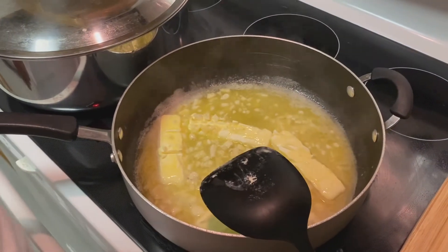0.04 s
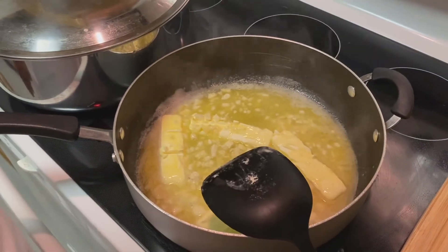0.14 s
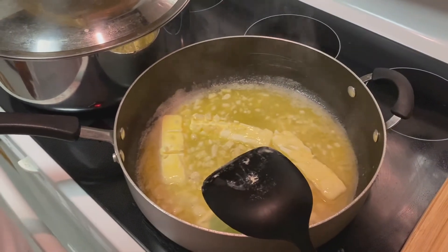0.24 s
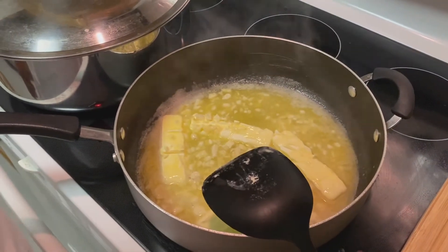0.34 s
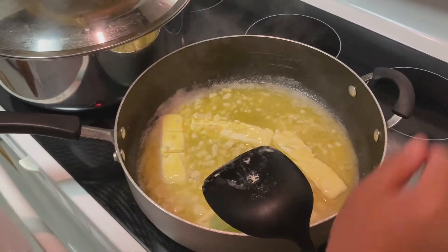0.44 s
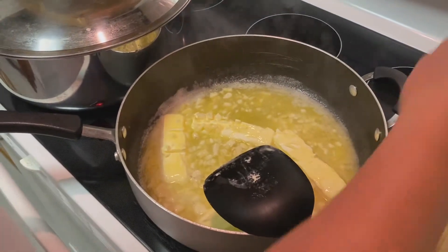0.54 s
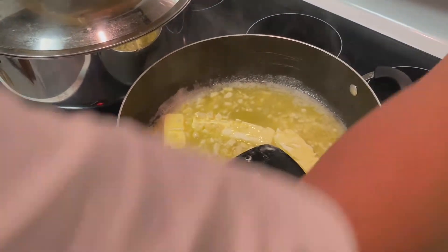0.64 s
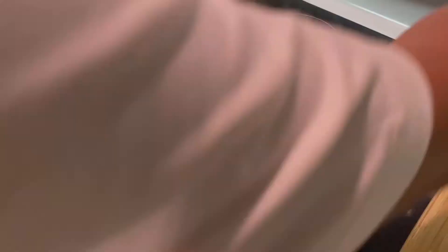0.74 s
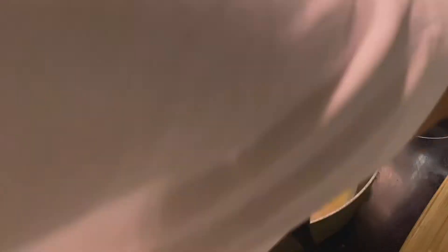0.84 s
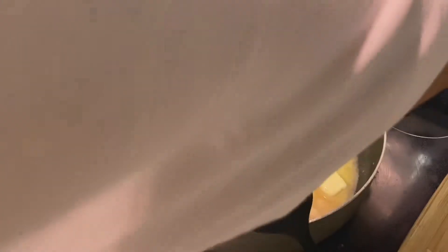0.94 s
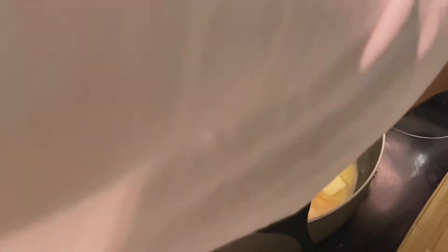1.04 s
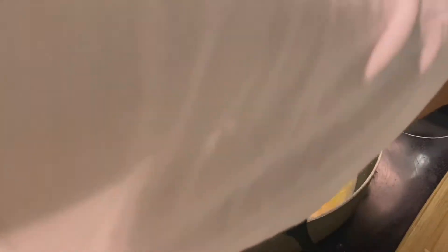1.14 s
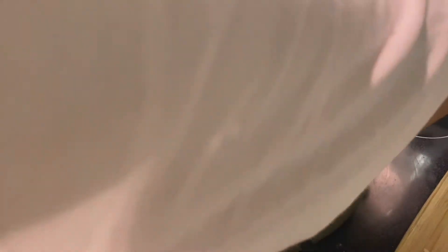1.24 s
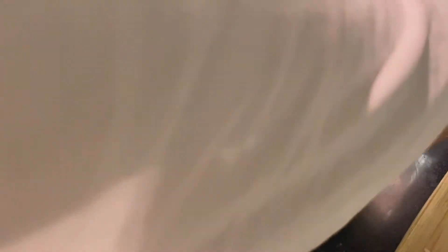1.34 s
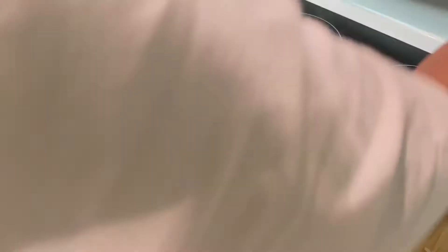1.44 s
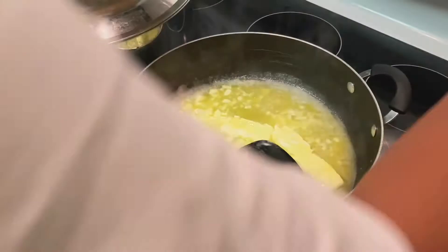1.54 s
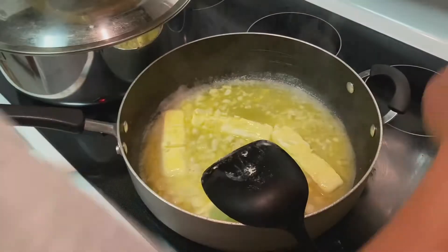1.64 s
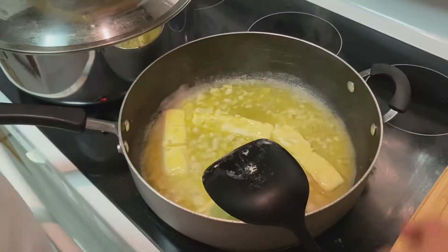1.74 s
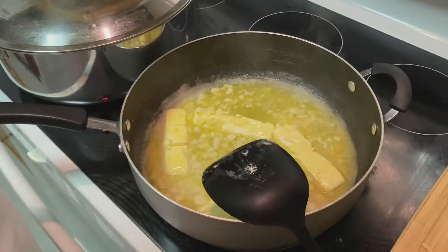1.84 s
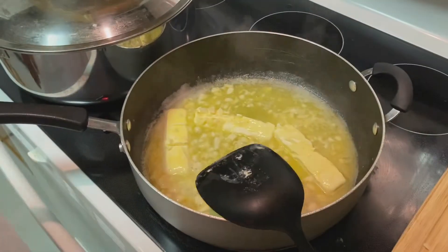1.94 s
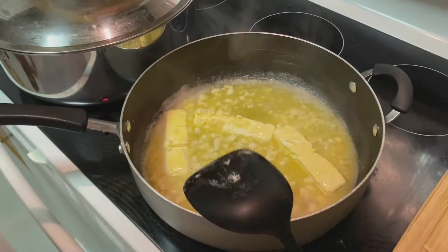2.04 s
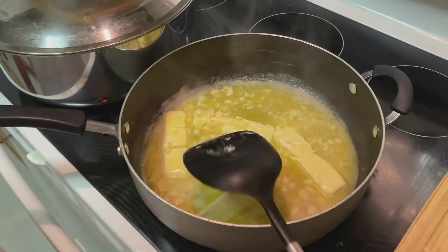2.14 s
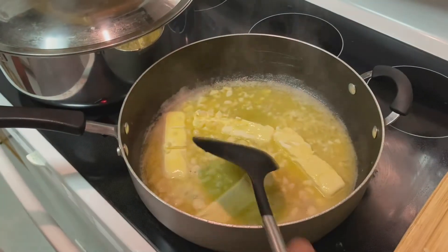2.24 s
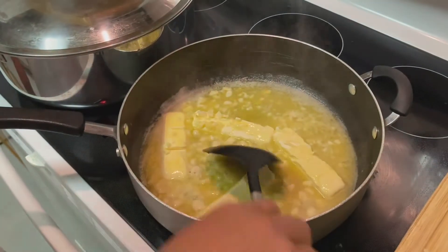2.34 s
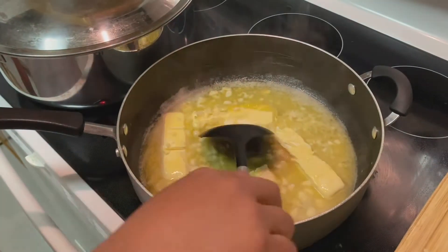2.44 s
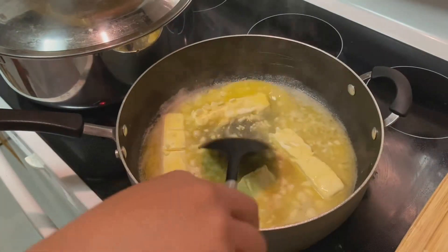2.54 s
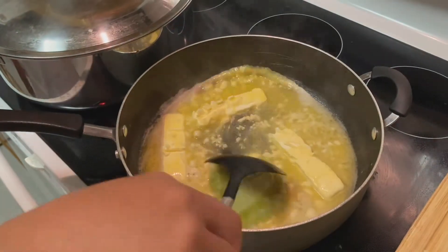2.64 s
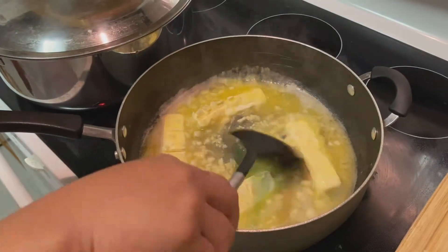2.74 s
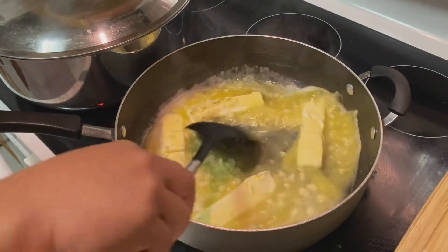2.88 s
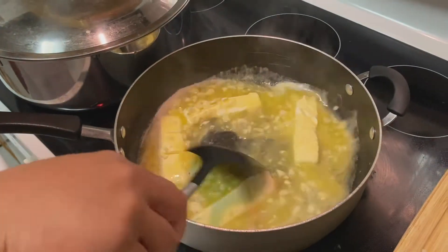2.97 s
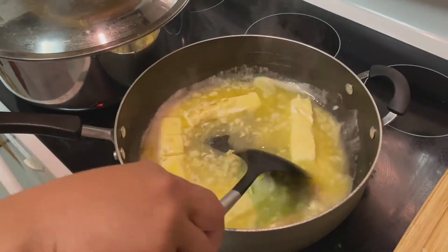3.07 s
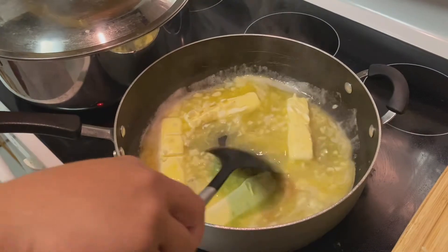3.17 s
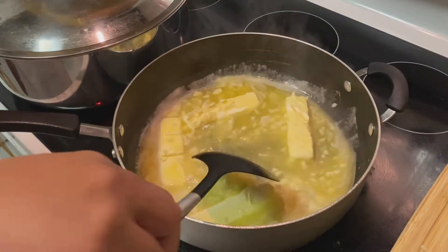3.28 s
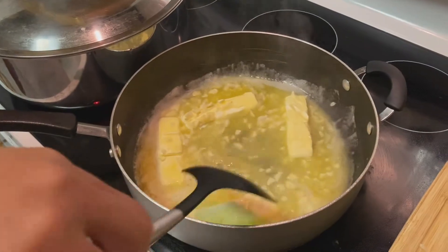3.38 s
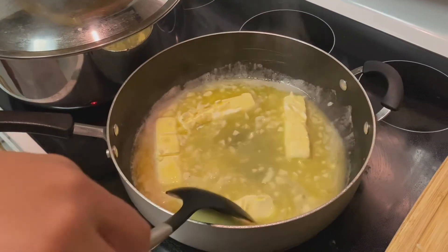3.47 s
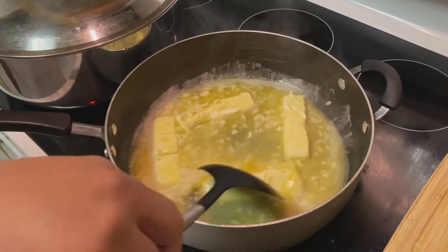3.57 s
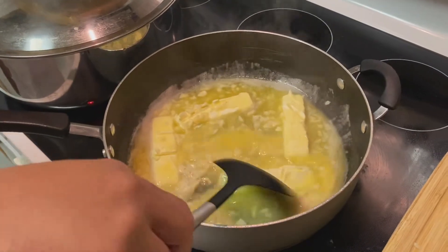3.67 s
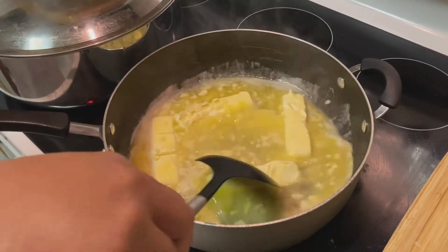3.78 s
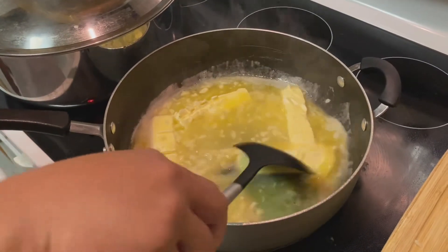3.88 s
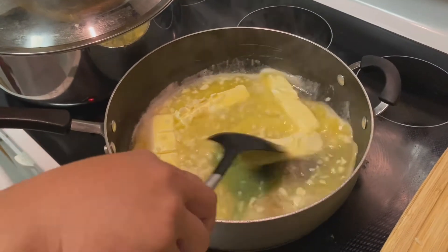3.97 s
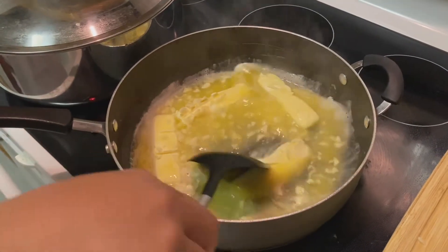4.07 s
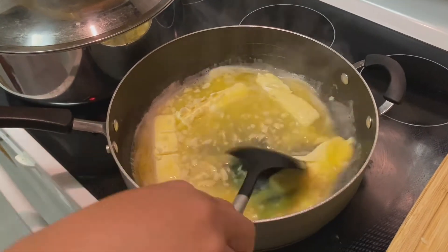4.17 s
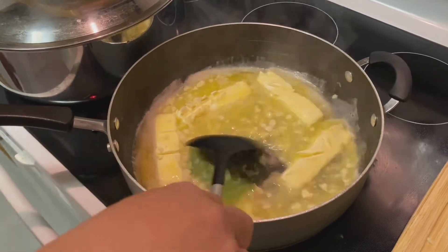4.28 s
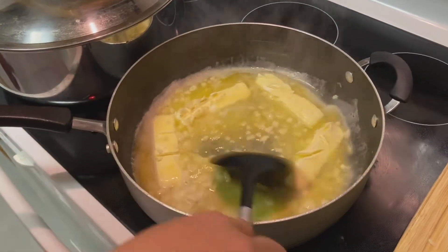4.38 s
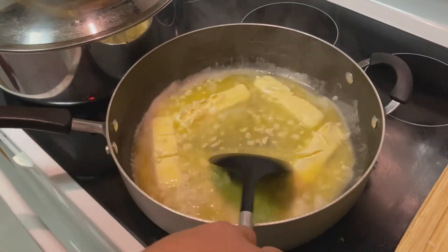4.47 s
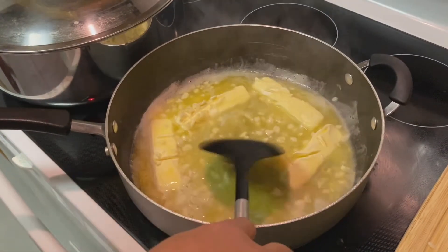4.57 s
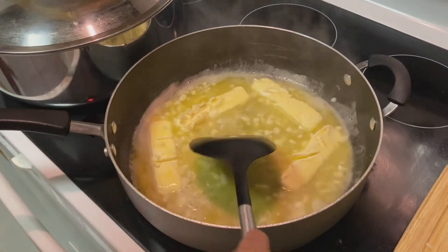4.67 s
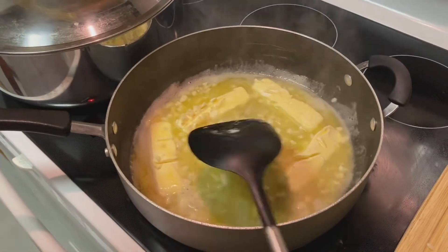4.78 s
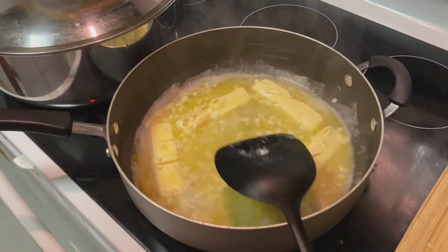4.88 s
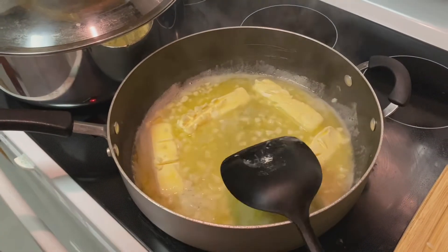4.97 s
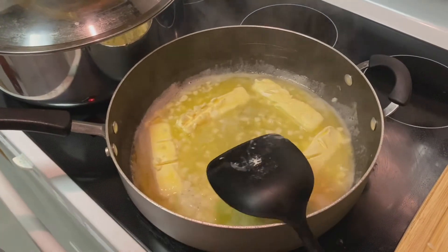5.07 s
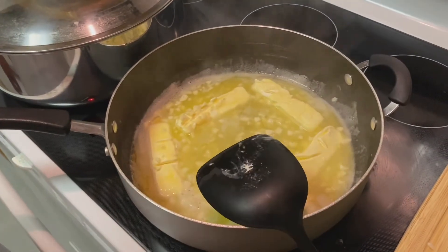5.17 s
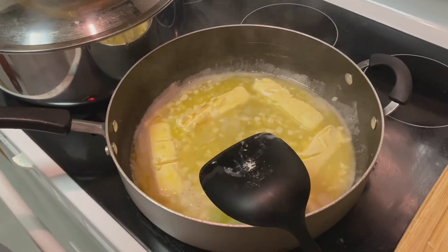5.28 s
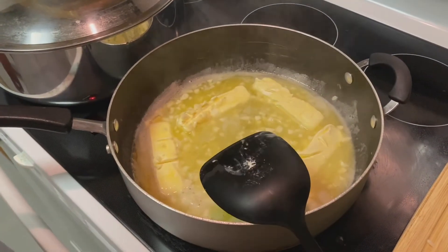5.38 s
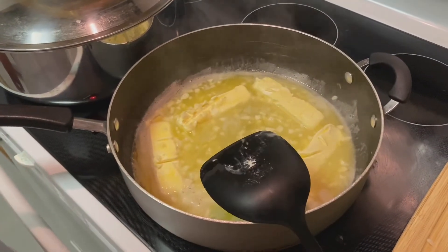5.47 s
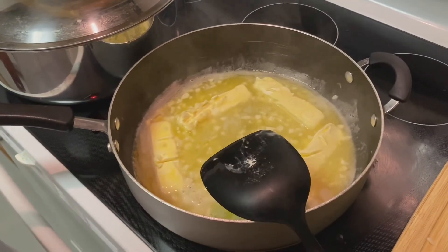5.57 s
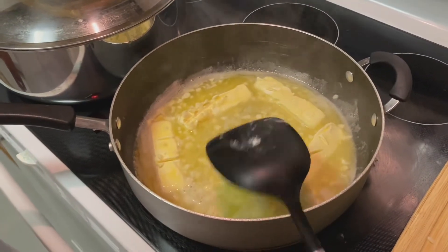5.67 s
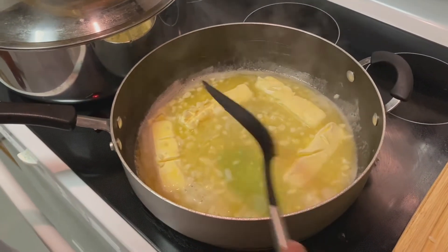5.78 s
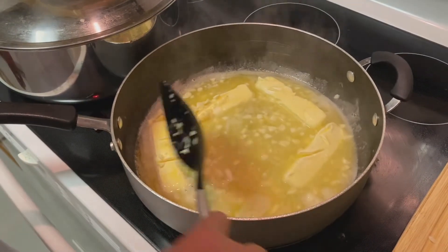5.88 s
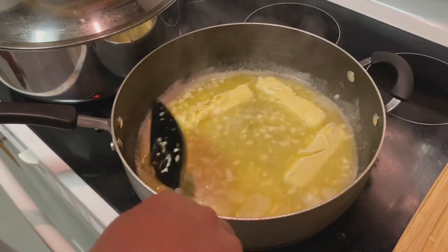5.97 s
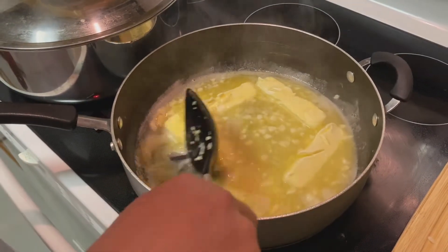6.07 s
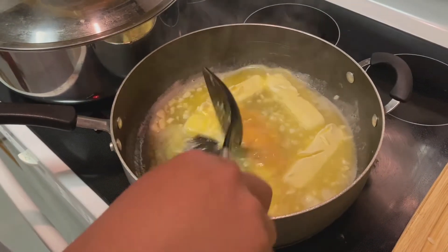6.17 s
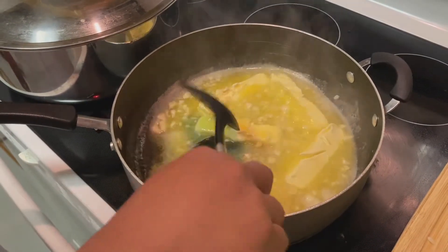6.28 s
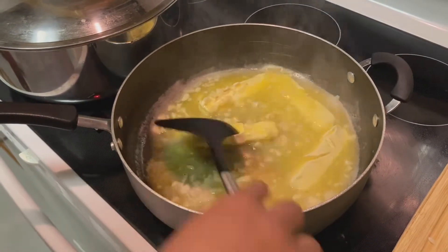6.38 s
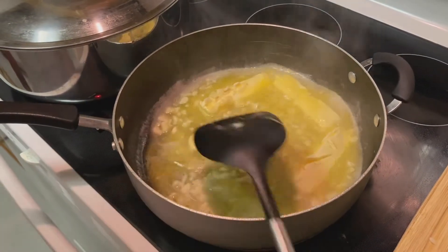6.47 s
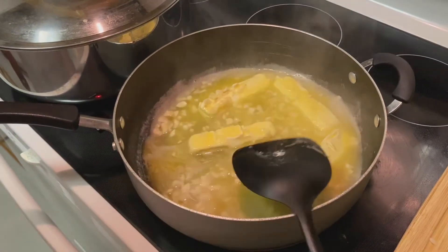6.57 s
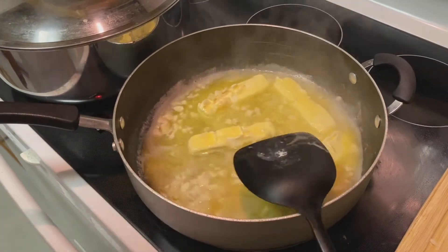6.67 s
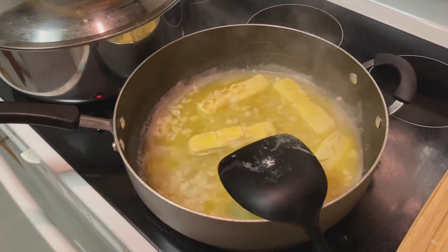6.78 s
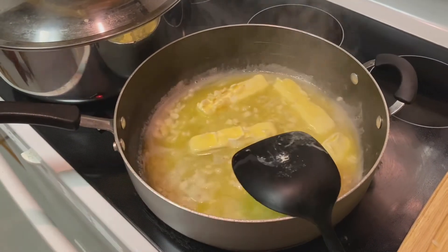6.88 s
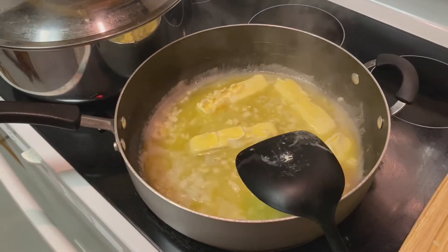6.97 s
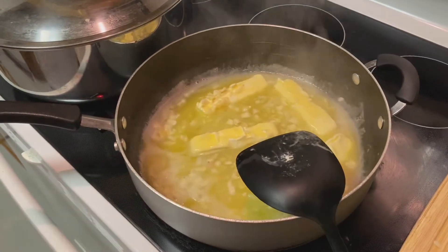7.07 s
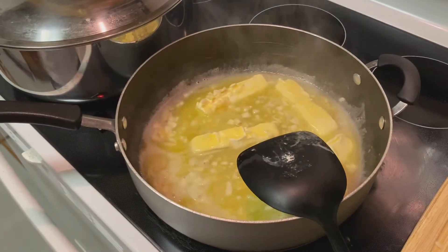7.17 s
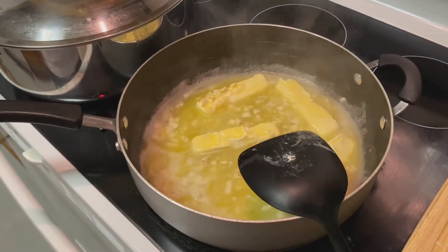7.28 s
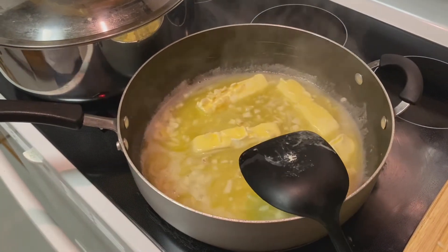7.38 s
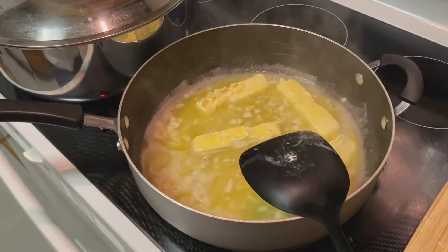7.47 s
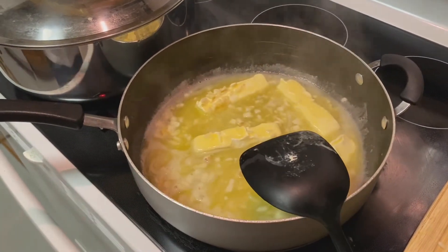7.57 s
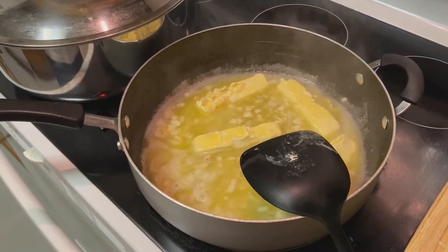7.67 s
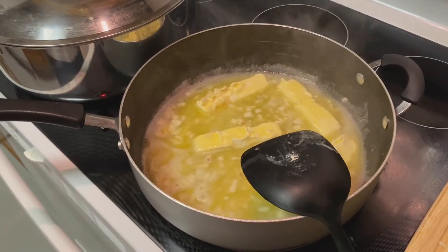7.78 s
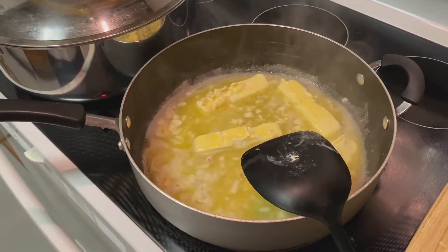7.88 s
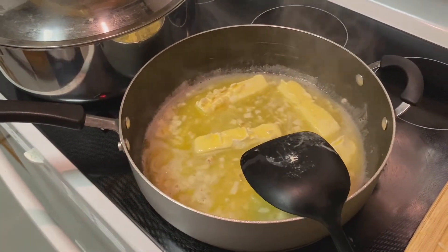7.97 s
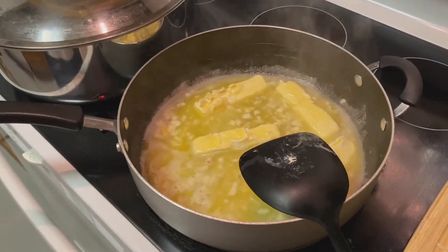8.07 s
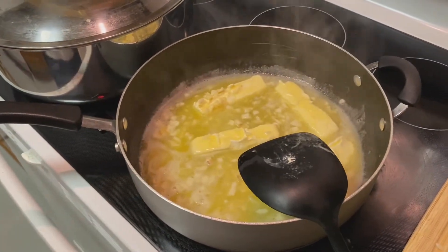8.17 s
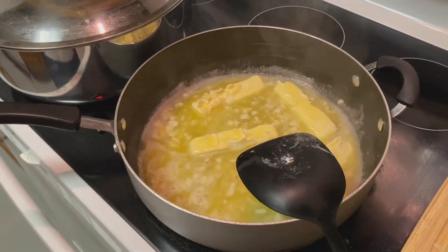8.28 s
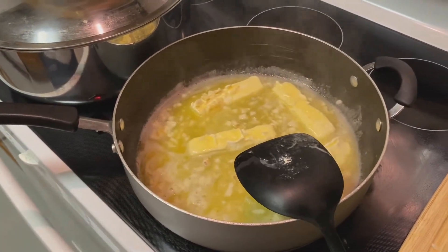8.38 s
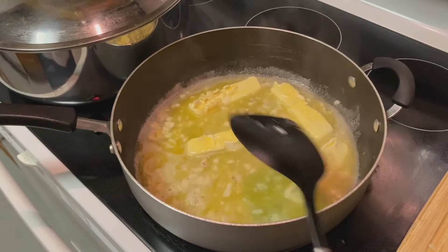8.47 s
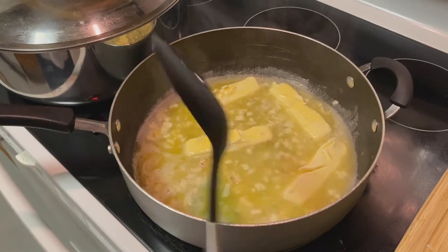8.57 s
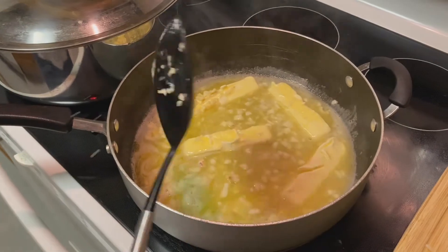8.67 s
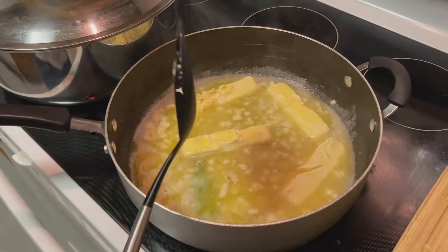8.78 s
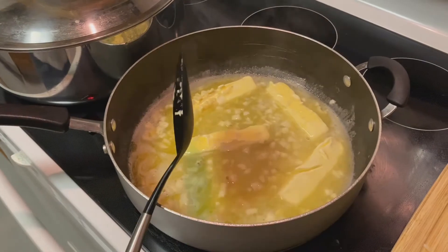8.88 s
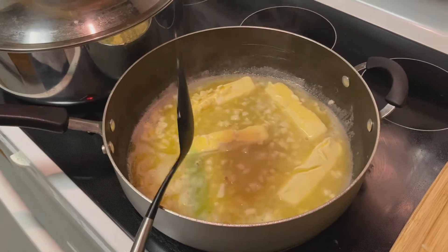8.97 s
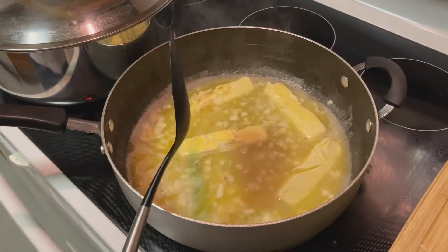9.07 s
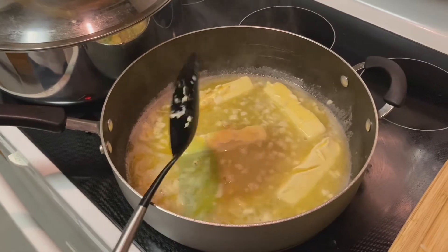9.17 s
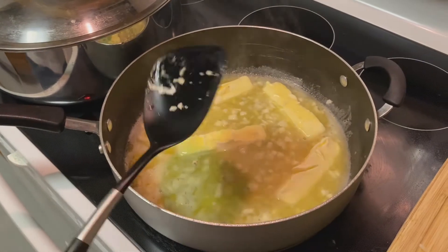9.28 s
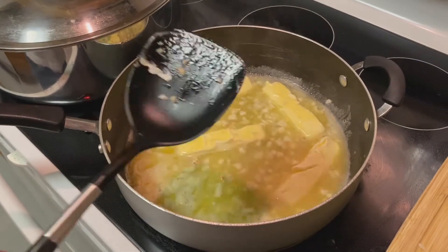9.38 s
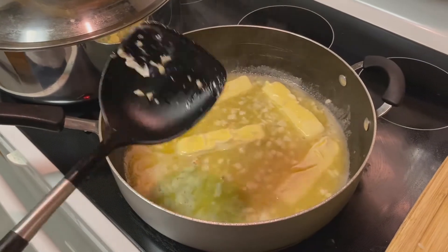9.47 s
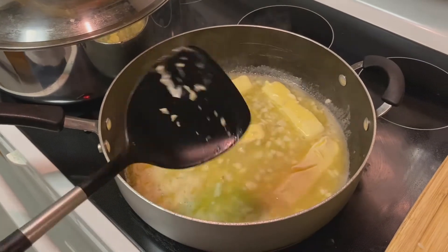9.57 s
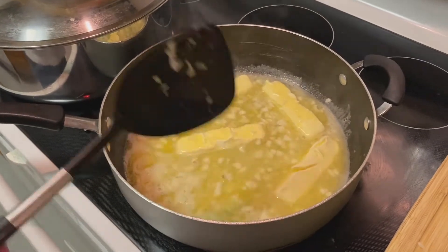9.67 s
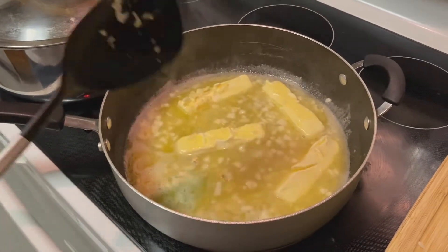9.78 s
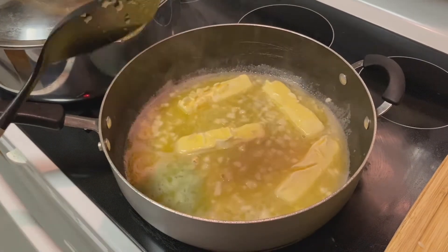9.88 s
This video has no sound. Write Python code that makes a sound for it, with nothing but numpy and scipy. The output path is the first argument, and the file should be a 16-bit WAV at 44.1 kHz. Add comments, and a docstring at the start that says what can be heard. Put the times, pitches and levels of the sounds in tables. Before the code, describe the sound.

A small home kitchen, heard close in stereo, with low rumble and faint mains hum. Butter and garlic fizz softly throughout, with tiny pops and occasional bubbling. Around 0.8-1.1 s clothes rustle faintly; light bumps follow at 1.3 and 1.8 s, with short scrapes near 2 s. From 2.7 to 3.2 s a plastic spatula knocks and scrapes the nonstick pan as the sizzle flares. Softer scrapes come at 3.8 and 4.2 s with another flare. At 4.9-5.2 s the spatula clacks down on the rim. A sharp knock at 5.9 s leads to brief scraping, a swelling fizz, and a second clattery laying-down at 6.5-6.9 s. Cloth rustles at 7.1-7.6 s and slightly at 8.1 s. A quick fizz burst and light scrape come near 8.4 s, then two hard, ringing raps at 9.0 and 9.1 s, leaving quiet sizzling until about 9.9 s.

```python
"""In a small kitchen with a low hum, butter and garlic sizzle throughout in a nonstick pan on a glass hob.
The cook's clothes rustle; then a plastic spatula, ringing the modes of pan and hob, knocks and scrapes by
stick and slip. Near 4.9 s and 6.6 s it is laid down with its neck on the rim and adds its own modes.
Clothes rustle again as friction noise, and near 9 s two raps on the rim shake the spatula clean.
The fizz is filtered noise that flares four times; a small stereo recorder is held close by."""
import sys
import numpy as np
from scipy import signal
from scipy.fft import rfft, irfft, next_fast_len
from scipy.io import wavfile

SR = 44100
rng = np.random.default_rng(int(sys.argv[2]) if len(sys.argv) > 2 else 0)


def store_wav(level_fs):
    """Save 16-bit WAV to argv[1]."""
    pcm = np.round(np.clip(np.atleast_2d(level_fs), -1, 1) * 32767)
    wavfile.write(sys.argv[1], SR, pcm.T.astype(np.int16))


N = 437913
RING = int(.7 * SR)  # longest ring, in samples
AGE = np.arange(RING) / SR  # time since the contact, s


def from_db(db):
    """Logarithmic level: decibels become an amplitude gain."""
    return 10 ** (np.asarray(db) / 20)


def rms(x):
    """Effective value: root of the mean square."""
    return np.sqrt(np.mean(x ** 2) + 1e-24)


def at_hz(points, hz):
    """Interpolation of a curve along a logarithmic frequency axis."""
    f, value = np.transpose(points)
    return np.interp(np.log(np.maximum(hz, 1)), np.log(f), value)


def butter(x, hz, kind):
    """Maximally flat recursive filtering, designed at order two."""
    return signal.sosfilt(signal.butter(2, hz, kind, fs=SR, output="sos"), x)


def below(x, hz):
    """Low half of a fourth-order crossover."""
    return butter(butter(x, hz, "low"), hz, "low")


def above(x, hz):
    """High half of a fourth-order crossover."""
    return butter(butter(x, hz, "high"), hz, "high")


def add(out, s, sound):
    """Superposition of a sound from time s on."""
    i = max(round(s * SR), 0)
    out[:, i:i + sound.shape[1]] += sound[:, :out.shape[1] - i]


def panned(sound, db):
    """Level difference between the channels: leans a sound to the left by db."""
    return sound * from_db([[db / 2], [-db / 2]])


def dying(t60):
    """Exponential decay by 60 dB in t60 seconds."""
    return from_db(-60 * AGE / t60)


def resonate(x, hz, q, boost_db):
    """Resonance: adds a peak-filtered copy to a sound."""
    return x + from_db(boost_db) * signal.lfilter(*signal.iirpeak(hz, q, fs=SR), x)


def gliding(x, hz, q, boost_db, size=128):
    """Moving resonance: its centre (Hz, per sample) is renewed block by block."""
    lifted, state = np.zeros_like(x), np.zeros((2, 2))
    for i in range(0, x.shape[1], size):
        peak = signal.iirpeak(hz[i], q, fs=SR)
        lifted[:, i:i + size], state = signal.lfilter(*peak, x[:, i:i + size], zi=state)
    return x + from_db(boost_db) * lifted


def grains(per_s, spread_db, size):
    """Random impulse process: clicks of uneven size and either sign."""
    sizes = from_db(spread_db * np.minimum(rng.exponential(1, size), 4))
    sizes = sizes * rng.choice([-1, 1], size)
    return sizes * (rng.random(size) < per_s / SR)


def tone(rule, weight_db, hardness_db):
    """Contact mechanics: weight drives thud and body, hardness drives clack and crisp (all dB)."""
    thud_db, body_db, body_share, clack_db, clack_share, crisp_db = rule
    thud = thud_db + weight_db
    body = body_db + body_share * weight_db
    clack = clack_db + clack_share * hardness_db
    return thud, body, clack, crisp_db + hardness_db


# borders between thud, body, middle, clack and crisp: (border_hz)
BORDERS = [200, 600, 1800, 4000]


def voiced(sound, level_db, colour, start, end):
    """Band energy: sets the level of each of five bands by its rms between start and end (s)."""
    thud, body, clack, crisp = colour
    out = 0
    for hz, db in zip(BORDERS + [None], [thud, body, 0, clack, crisp]):
        part = sound
        if hz:
            part = below(sound, hz)
            sound = above(sound, hz)
            if np.ndim(out):  # the lower parts stay in phase with this one
                out = below(out, hz) + above(out, hz)
        out = out + part * from_db(level_db + db) / rms(part[:, int(start * SR):int(end * SR)])
    return out


# likeness of left and right, 1 when identical: (band_hz, correlation)
LIKENESS = [(100, .97), (350, .9), (650, .55), (1200, .2), (2800, .35), (6000, .25)]


def noise_bands(spectrum, size):
    """Spatial coherence: yields (Hz, stereo noise) in half-octave bands, mixed from mid and side."""
    edges = np.geomspace(22, 17000, 21)
    for low, high in zip(edges, edges[1:]):
        hz = np.sqrt(low * high)
        noise = rng.standard_normal((2, size + 4000))
        mid, side = butter(noise, [low, high], "band")[:, 4000:]  # skips the filter's start
        alike = np.clip(at_hz(LIKENESS, hz), -1, 1)
        stereo = np.sqrt(1 + alike) * mid + np.sqrt(1 - alike) * np.array([side, -side])
        yield hz, from_db(at_hz(spectrum, hz)) * stereo


def mode_rings(modes, smear):
    """Modal decay: one stereo ring per mode, wavering at random, as reflections in the room smear it."""
    rings = []
    for k, (hz, db, t60) in enumerate(modes):
        # a phase difference between the channels gives the likeness
        apart = np.arccos(np.clip(at_hz(LIKENESS, hz), -1, 1)) / 2 * rng.choice([-1, 1])
        slow = butter(rng.standard_normal((2, 2, RING)), 30, "low")
        waver = 1 + smear * min(hz / 1500, 1) * (slow[0] + 1j * slow[1]) / rms(slow)
        turning = np.exp(1j * (2 * np.pi * hz * AGE + [[apart], [-apart]]))
        ring = np.imag(waver * turning) / rms(abs(waver))
        rings.append((-1) ** k * from_db(db) * dying(t60) * ring)
    return np.array(rings)


def struck(rings, spread_db):
    """Modal excitation: each contact point favours other modes, here by chance."""
    return np.tensordot(from_db(rng.normal(0, spread_db, len(rings))), rings, 1)


# crowd of weak, short modes of pan and hob, relative density: (band_hz, density_db_per_hz)
CLATTER = [(25, -18), (60, -5), (130, 7.5), (200, -2), (330, 0), (520, -2), (650, -7), (900, -3),
           (1350, -5.5), (1900, -11), (3000, -5), (4700, -9.5), (5800, -6), (7500, -13.5), (10000, -22),
           (15000, -23.5)]
# reverberation of the kitchen: (band_hz, t60_s)
KITCHEN = [(60, 1), (150, 0.57), (500, .4), (1500, 0.36), (5000, 0.4), (14000, 0.28)]


def clatter(clatter_db, room_db, short_t60):
    """Modal overlap: dense modes act as noise, lows build up later, and the kitchen prolongs all."""
    out = 0
    for hz, band in noise_bands(CLATTER, size=RING):
        swell = 1 - np.exp(-AGE * hz / 0.63)
        room = from_db(room_db) * dying(at_hz(KITCHEN, hz))
        out = out + band * swell * (dying(short_t60) + room)
    return from_db(clatter_db) * out


# relative spectrum of the room noise: (band_hz, density_db_per_hz)
RUMBLE = [(20, -15.5), (40, -3.5), (75, 3), (130, -7), (200, -15.5), (300, -10.5), (420, -14), (700, -20),
          (1000, -20), (1700, -28.5), (4300, -28), (7000, -34), (15000, -44.5)]
# mains hum of hob and fridge, level before its waver: (pitch_hz, level_db)
HUM = [(99.8, -64), (228, -75)]


def room_tone(rumble_db, waver):
    """Stationary noise and slowly modulated tones: the kitchen's rumble and wavering hum."""
    rumble = sum(band for _, band in noise_bands(RUMBLE, size=N))
    t = np.arange(N) / SR
    hum = 0
    for hz, db in HUM:
        slow = butter(rng.standard_normal((2, N)), 3.5, "low")
        strength, phase = waver * slow / rms(slow)
        hum = hum + from_db(db) * np.sqrt(2) * (1 + strength) * np.sin(2 * np.pi * hz * t + phase)
    return from_db(rumble_db) * rumble / rms(rumble) + hum


# relative spectrum of the butter's fizz: (band_hz, density_db_per_hz)
HISS = [(2000, -4), (4300, -3.5), (5600, -2), (7000, -2), (10000, -2.5), (12500, -3.5), (15000, -1)]
# the sizzle sinks while the cook leans in front of it and as stirring cools the butter;
# common level, before the trims of fizz and pops and before flares: (time_s, level_db)
SIZZLE = [(0, -72.5), (1.4, -78.5), (1.6, -71.5), (2.5, -72), (3.7, -75), (4.55, -80.5), (8.3, -79.5),
          (9.1, -75.5), (9.93, -75)]
# it flares when the spatula bares hot metal: (peak_s, rise_s, gain_db)
FLARES = [(2.88, 0.13, 6), (4.25, 0.086, 7), (6.4, .5, 10), (8.335, 0.031, 18)]
FLARE_FALL, SHORTEST_FALL_S = 2.5, .18  # the fall in rise times, and its least length


def sizzle(hiss_db, pops_db, pops_per_s, flicker_db):
    """Boiling noise: water leaves the butter as a restless fizz and tiny bursting bubbles."""
    hiss = sum(band for _, band in noise_bands(HISS, size=N))
    flicker = butter(rng.standard_normal(N), 150, "low")
    hiss = hiss * from_db(flicker_db * flicker / rms(flicker))
    pops = grains(pops_per_s, spread_db=1.5, size=N) * rng.uniform(.4, 1, (2, N))
    pops = butter(pops, 6000, "high")
    t = np.arange(N) / SR
    flare_db = 0
    for s, rise, db in FLARES:
        fall = max(FLARE_FALL * rise, SHORTEST_FALL_S)
        flare_db = flare_db + np.interp(t, [s - rise, s, s + fall], [0, db, 0])
    level = from_db(np.interp(t, *np.transpose(SIZZLE)) + flare_db)
    return level * (from_db(hiss_db) * hiss / rms(hiss) + from_db(pops_db) * pops / rms(pops))


def simmer(level_db, per_s, q):
    """Bubble resonance: larger bubbles burst at random at ten pitches, each ringing a few cycles."""
    out = np.zeros((2, N))
    for hz in np.geomspace(450, 1900, 10):
        bursts = grains(per_s, spread_db=3.0, size=N) * rng.uniform(.5, 1, (2, N))
        # the tiny offset keeps the silent filter from slowing down
        out += signal.lfilter(*signal.iirpeak(hz, q, fs=SR), bursts + 1e-18) / hz
    return from_db(level_db) * out / rms(out)


# clothes, level of the middle band before the layer's trim: (middle_s, length_s, level_db, pitch_hz)
RUSTLES = [(.86, 0.33, -68.5, 3600), (1.035, .12, -59.5, 1500), (7.098, 0.2, -61, 3200),
           (7.295, 0.17, -60, 3800), (7.351, .11, -52, 1450), (7.605, .06, -60.5, 1600),
           (8.135, .09, -59, 500)]
# energy around the middle band: (thud_db, body_db, body_weight_share, clack_db, clack_hardness_share, crisp_db)
CLOTH_TONE = (-15.5, -10, 0, -3.5, .5, 2.0)
PLAIN_RUB_HZ, RUB_DB_PER_OCTAVE = 3000, 10.5  # a higher rub is brighter


def rustles(fibres_per_s):
    """Friction noise: cloth slides on cloth in fine grains of broad pitch, smeared by the kitchen."""
    out = np.zeros((2, N))
    response = clatter(clatter_db=0, room_db=-22.5, short_t60=0.017)
    for s, length, level_db, rub_hz in RUSTLES:
        size = int(length * SR)
        rub = grains(fibres_per_s, spread_db=1.5, size=size) * np.hanning(size)
        sound = signal.fftconvolve(rub[None], response, axes=1)
        sound = resonate(sound, rub_hz, q=2.7, boost_db=-3.0)
        colour = tone(CLOTH_TONE, 0, RUB_DB_PER_OCTAVE * np.log2(rub_hz / PLAIN_RUB_HZ))
        add(out, s - length / 2, voiced(sound, level_db, colour, length / 4, length * 0.48))
    return out


# modes of the hob's top, thudding under the pan, relative levels: (pitch_hz, level_db, t60_s)
HOB = [(63.9, -9, 0.7), (76.9, -12.5, 1), (126, -1, .42), (156.3, 5.5, 0.3), (186.3, -20, .22),
       (233.5, 0, 0.13), (257.6, 0.5, 0.14), (277, -10.5, 0.2), (313.9, 4.5, 0.21), (347, -4.5, .18),
       (372.6, -1, 0.21), (416.5, -5, 0.4)]
# modes of the pan's wall and bottom, relative levels: (pitch_hz, level_db, t60_s)
PAN = [(455, -8, 0.14), (516, -7, 0.35), (563, -5.5, 0.14), (660, -4.5, 0.15), (768, -9.5, 0.34),
       (820, -13.5, .22), (862, -4, 0.18), (916, -7, 0.18), (1050, -8.5, .2), (1066, -2.5, .3),
       (1179, -6, 0.2), (1320, -5.5, 0.22), (1365, 1.5, 0.17), (1438, -6.5, 0.28), (1743, -8, 0.3),
       (1911, -14, .18), (2300, -4, 0.18), (2370, -10, 0.22), (2830, -6, .18), (3060, -9.5, 0.11),
       (3440, -8, .18), (3790, -10, .22), (3960, -9.5, 0.27), (4250, -7, .15), (5270, -4.5, .22),
       (5530, -5.5, 0.35), (5595, -4.5, .24), (5760, -9, 0.27), (6160, -6, .16), (6640, -8.5, .18)]


def hob_and_pan():
    """Modal superposition: the rings of the hob's top and of the pan."""
    return mode_rings(HOB, smear=0.25), mode_rings(PAN, smear=0.68)


# strokes over the pan's bottom and wall, level of the middle band before chatter and the layer's trim:
# (middle_s, length_s, level_db, weight_db, hardness_db, chatter_hz, left_minus_right_db)
STROKES = [(1.978, 0.083, -45, -0.5, -5.5, 5700, 0), (2.075, .1, -50.5, 7, -5, 1064, -0.5),
           (2.88, 0.58, -56, -6, -4, 1000, -0.5), (2.779, 0.044, -45.5, -12, -15, 800, 3),
           (2.903, 0.18, -45.5, -17, -12.5, 760, 4), (3.05, .035, -40, -7, -30, 377, 2.5),
           (3.157, .06, -45, -10, -13.5, 880, 3), (3.818, .04, -56.5, -28, -10, 1600, 0),
           (4.24, .12, -48.5, -6, -4.5, 2400, -0.5), (4.459, 0.095, -61, -3, -4, 930, 1),
           (5.629, .07, -51.5, 1, -5, 5500, 0), (6.05, 0.081, -48.5, -13, -7.5, 1080, 0.5),
           (6.243, 0.077, -61, -10.5, -6.5, 1600, -2), (6.46, .16, -65, -22, 3, 5000, 0),
           (6.52, .03, -54.5, -16, 6, 2800, 0.5), (6.764, 0.063, -38, -3, -14, 560, 1),
           (8.41, .04, -50.5, -6, 8, 5800, -0.5)]
# energy around the middle band: (thud_db, body_db, body_weight_share, clack_db, clack_hardness_share, crisp_db)
STROKE_TONE = (0, 1.5, 0.19, -1.0, .8, -.8)
CHATTER_SAG_OCTAVES_PER_S = 3.4  # the chatter slows as the blade loses speed
PRESSED_T60_S = .6  # further decay of the pan's ring under the pressed blade


def strokes(pan, slips_per_s, ring_db, lowest_hz):
    """Stick-slip friction: the edge chatters at a pitch set by angle and pressure, hardly shaking the hob."""
    out = np.zeros((2, N))
    ring = from_db(ring_db) * struck(pan, spread_db=4.0) * dying(PRESSED_T60_S)
    response = ring + clatter(clatter_db=20.0, room_db=-16.5, short_t60=0.037)
    response = butter(response, lowest_hz, "high")
    for s, length, level_db, weight_db, hardness_db, chatter_hz, left_db in STROKES:
        size = int(length * SR)
        slips = grains(slips_per_s, spread_db=2.5, size=size) * signal.windows.tukey(size, .7)
        sound = signal.fftconvolve(slips[None], response, axes=1)
        colour = tone(STROKE_TONE, weight_db, hardness_db)
        sound = voiced(sound, level_db, colour, length / 4, length * 1.08)
        from_middle = np.minimum(np.arange(sound.shape[1]) / SR, length) - length / 2
        pitch = chatter_hz * 2 ** (-CHATTER_SAG_OCTAVES_PER_S * from_middle)
        sound = gliding(sound, pitch, q=8.0, boost_db=4.0)
        add(out, s - length / 2, panned(sound, left_db))
    return out


# knocks of the spatula: level of the middle band before resonance and the layer's trim, weight behind
# the blow, hardness of the contact, resonance favoured by the spot, contact cut-off:
# (start_s, level_db, weight_db, hardness_db, spot_hz, cutoff_hz)
KNOCKS = [(1.289, -55.5, -6, 2, 560, 6000), (1.562, -71.5, -6, 9, 3000, 14000),
          (1.807, -55, 12, -24, 600, 6000), (1.877, -44, 6, -26, 760, 5000),
          (1.939, -47, 7.5, -3, 2850, 9000), (2.655, -50.5, -25, -20, 980, 6000),
          (2.737, -34.5, -6, -12, 3100, 9000), (4.187, -50.5, -4, -11, 520, 7000),
          (4.908, -38, -1, -.5, 3100, 7500), (4.96, -49, 6, -9, 2870, 6000),
          (5.119, -32, -3, -9, 1064, 8800), (5.175, -49.5, 9, -16, 240, 6000),
          (5.602, -57, 5, -8, 900, 10000), (5.9335, -23.5, -9, -7, 340, 12000),
          (6.128, -57.5, 1, -1, 2220, 9000), (6.542, -31.5, 2.5, 4, 3000, 10000),
          (6.621, -39.5, 4, -1.5, 3000, 10000), (6.766, -36.5, 1, -8, 128, 7900),
          (6.893, -52, 3, -8, 2800, 7000), (7.768, -67, -12, -4, 2400, 8000), (8.41, -58, 7, 5, 157, 7000),
          (8.827, -48, -22, 0.5, 2600, 17000), (8.974, -23.5, -1, -2, 3100, 12000),
          (9.1265, -23.5, 0, -1.5, 1090, 5800)]
# energy around the middle band: (thud_db, body_db, body_weight_share, clack_db, clack_hardness_share, crisp_db)
KNOCK_TONE = (-0.13, 2.2, .65, -2.0, 0.96, -.5)
# while the spatula is being laid down its free blade rings: (start_s, end_s)
LAID_DOWN = [(4.85, 5.05), (6.5, 6.7)]
# modes of the spatula resting on the rim, relative levels: (pitch_hz, level_db, t60_s)
SPATULA = [(129, -0.5, 0.93), (237.3, 7.5, .16), (431, 8, 0.11), (1330, 10.5, 0.1), (2010, -1.5, 0.11),
           (2767, 16.5, 0.088), (2895, 8, 0.24), (2990, 8, 0.0924), (2946, 5.5, 0.13), (3024, 12.5, 0.093),
           (3660, 5.5, 0.13), (4290, 1, 0.11), (4463, 1, .08), (4850, -8, 0.097), (5470, -0.5, .13)]


def knocks(hob, pan, snap_db, crack_db, crack_t60, damped_db, bounce_s, bounce_db):
    """Impact excitation: snap, crack, modes and clatter; a spatula laid down bounces and rings too."""
    out, spatula = np.zeros((2, N)), mode_rings(SPATULA, smear=0.8)
    spots = [clatter(clatter_db=17.0, room_db=-11.5, short_t60=0.071) for _ in range(3)]
    contact_band = [1100, 11000]  # Hz
    impulse = signal.unit_impulse((1, 256), (0, 0))
    snap = from_db(snap_db) * butter(impulse, contact_band, "band")
    for k, (s, level_db, weight_db, hardness_db, spot_hz, cutoff_hz) in enumerate(KNOCKS):
        noise = butter(rng.standard_normal((2, RING)), contact_band, "band")
        crack = from_db(crack_db) * noise * dying(crack_t60)
        body = struck(hob, spread_db=2.0) + from_db(-2.5) * struck(pan, spread_db=2.0)
        strike = spots[k % len(spots)] + crack
        add(strike, 0, snap)
        if any(start < s < end for start, end in LAID_DOWN):
            body = from_db(damped_db) * body + from_db(-3.0) * struck(spatula, spread_db=0.0)
            add(strike, bounce_s, from_db(bounce_db) * crack)
        sound = butter(body + strike, cutoff_hz, "low")
        sound = voiced(sound, level_db, tone(KNOCK_TONE, weight_db, hardness_db), 0, 0.024)
        add(out, s, resonate(sound, spot_hz, q=4.5, boost_db=-0.5))
    return out


def scene():
    """Linear superposition: room, sizzle and cloth beneath the spatula and pan."""
    room = room_tone(rumble_db=-58.5, waver=0.27)
    butter_fizz = sizzle(hiss_db=5.0, pops_db=-3.0, pops_per_s=130, flicker_db=3.0)
    bubbles = simmer(level_db=-79.0, per_s=2.5, q=11.0)  # per_s is for each pitch
    cloth = from_db(-3.0) * rustles(fibres_per_s=2700)
    hob, pan = hob_and_pan()
    stirring = from_db(-3.0) * strokes(pan, slips_per_s=1600, ring_db=-8.5, lowest_hz=380)
    hits = from_db(-1.14) * knocks(hob, pan, snap_db=27.0, crack_db=13.5, crack_t60=.016,
                                   damped_db=-4.0, bounce_s=0.0053, bounce_db=-5.5)
    return room + butter_fizz + bubbles + cloth + stirring + hits


# colour difference between the recorder's channels: (band_hz, left_minus_right_db)
BALANCE = [(50, 0.5), (155, -5.5), (245, 4.5), (400, 2), (560, -1), (800, 4), (1064, -0.5), (1350, 0.5),
           (2200, -0.5), (8000, -0.5)]
CUTOFF_HZ = 15900


def record(dry):
    """Stereo processing of the recorder: the treble becomes nearly one signal, inverted and late on the left."""
    size = next_fast_len(N + 4096)
    hz = np.fft.rfftfreq(size, 1 / SR)
    left, right = rfft(dry, size)
    joined = np.clip((hz - 6500) / 2500, 0, .93)  # share of the right signal, growing above 6.5 kHz
    late = -np.exp(-2j * np.pi * hz * .00025)  # inverted, 0.25 ms late
    left = np.sqrt(1 - joined ** 2) * left + joined * late * right
    lean = from_db(at_hz(BALANCE, hz) / 2)
    heard = irfft(np.array([left * lean, right / lean]), size)[:, :N]
    steep_lowpass = signal.ellip(10, .2, 70, CUTOFF_HZ, fs=SR, output="sos")
    return signal.sosfilt(steep_lowpass, heard)


dry = scene()
out = record(dry)
store_wav(out)
```